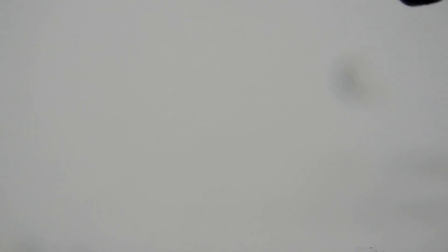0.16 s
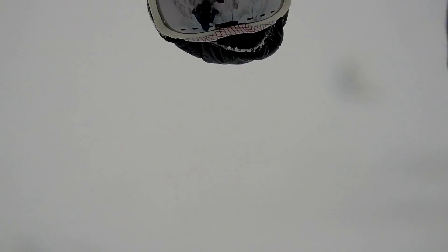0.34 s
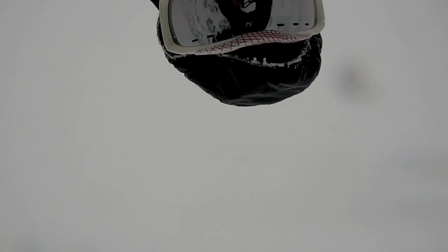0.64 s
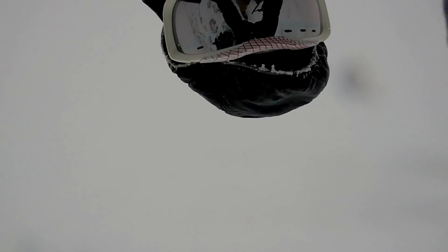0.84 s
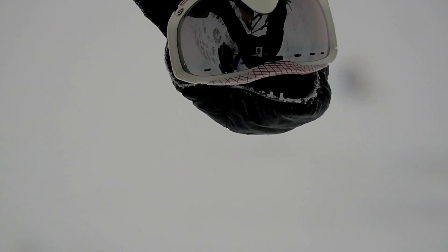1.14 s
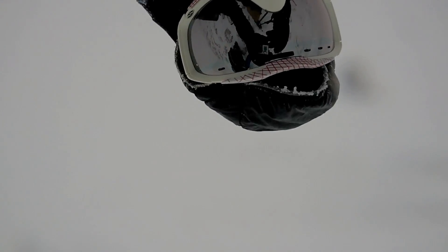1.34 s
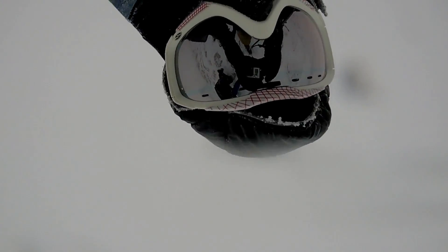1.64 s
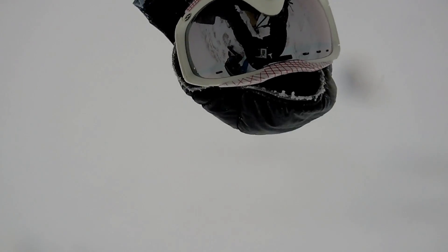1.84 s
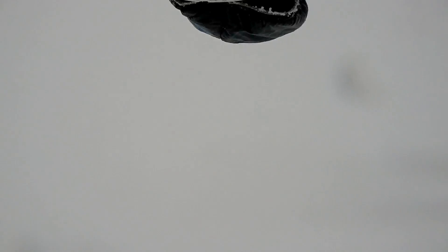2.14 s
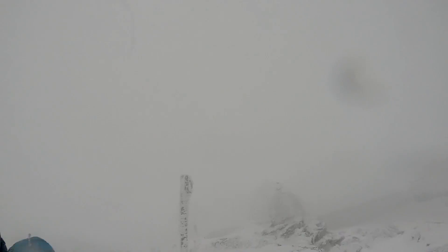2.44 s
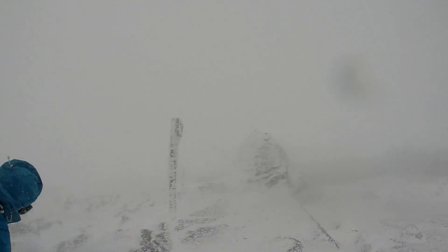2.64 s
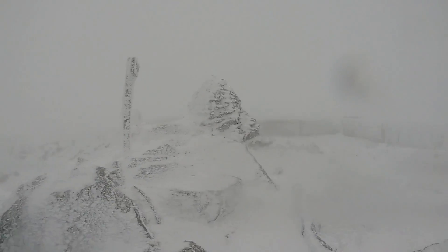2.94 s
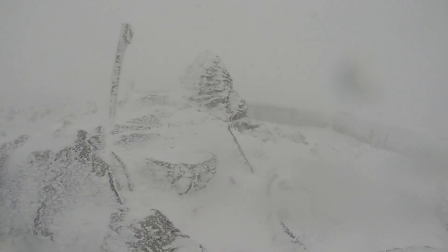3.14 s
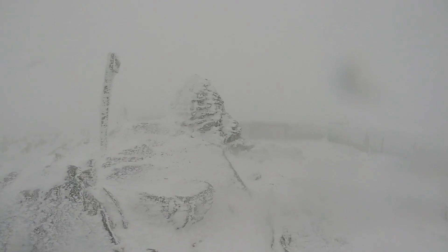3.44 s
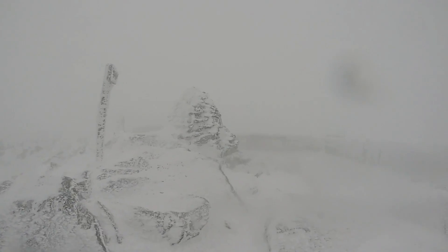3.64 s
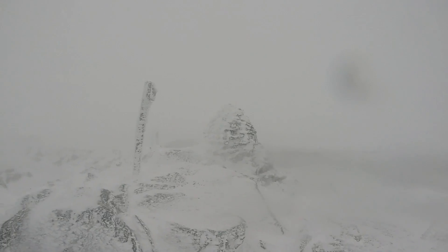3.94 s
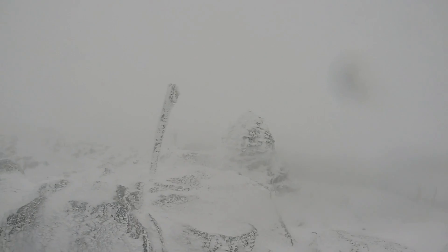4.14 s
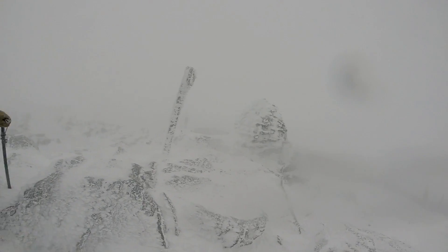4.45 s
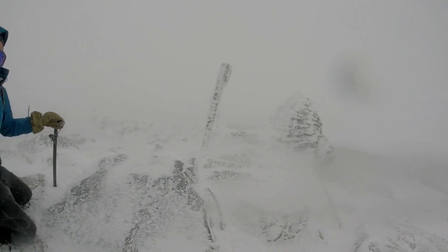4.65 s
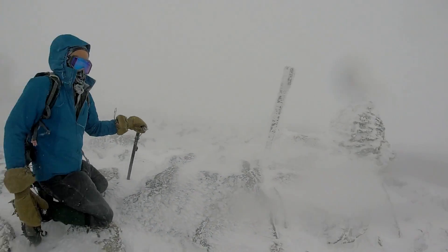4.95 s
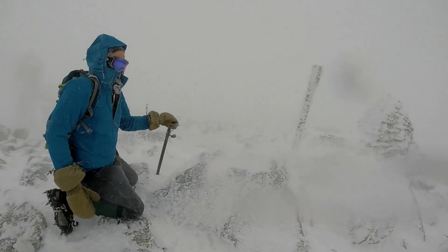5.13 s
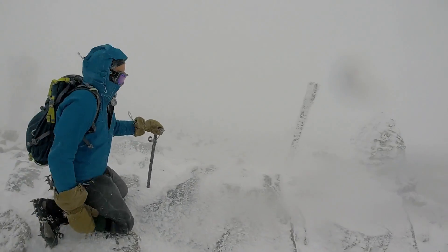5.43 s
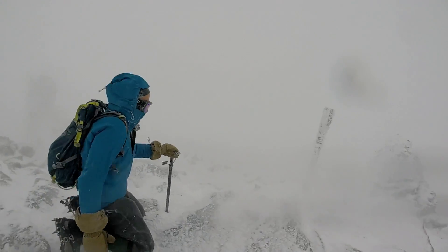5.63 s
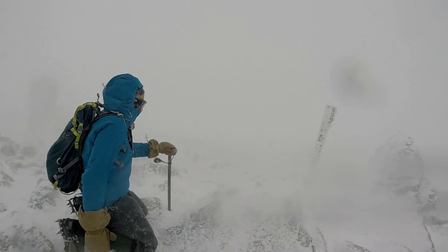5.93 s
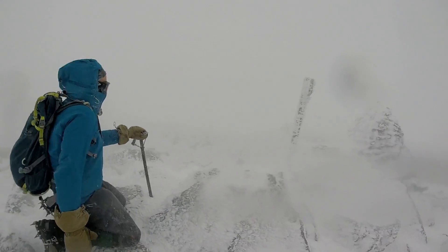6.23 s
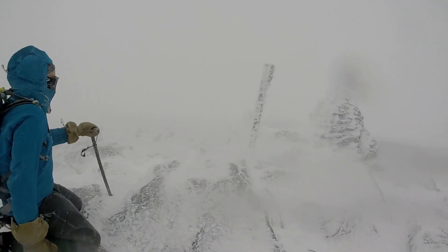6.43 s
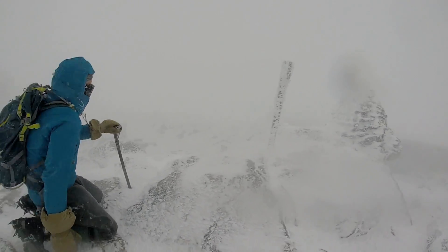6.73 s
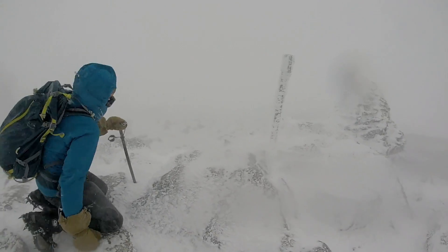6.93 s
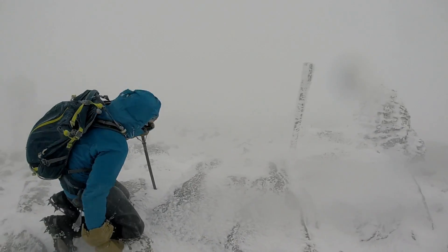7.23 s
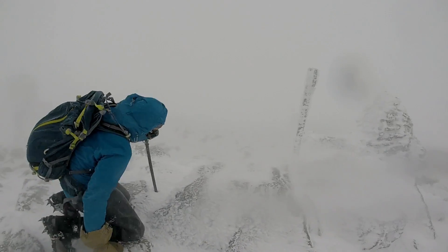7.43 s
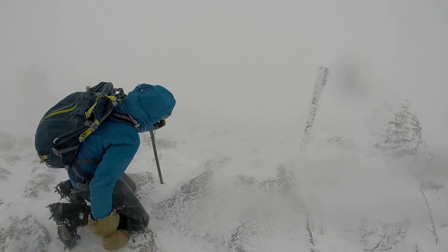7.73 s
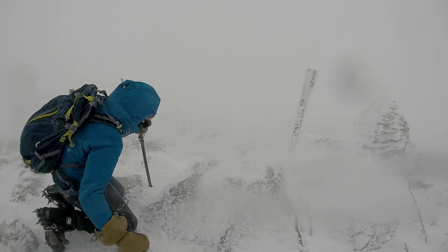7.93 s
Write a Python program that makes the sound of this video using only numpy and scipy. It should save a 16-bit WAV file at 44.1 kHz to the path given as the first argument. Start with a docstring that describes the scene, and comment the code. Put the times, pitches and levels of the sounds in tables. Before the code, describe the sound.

Wind strikes directly on a microphone inside a hard plastic shell, outdoors in blowing snow. Quick gusts slap and rumble, air rushes through the case, and snow sizzles over it. Hard ice ticks appear from the start; one short rub precedes a dense run of loud, distorted gusts around two seconds. More blasts follow to about four and a half seconds, then the sound thins into a hollow, wavering howl with scattered thumps and ticks.

```python
"""A gale on a snowy summit hits a small camera in a plastic case.
All along, gusts swell out of a steady wind: eddies thump on the microphone, air rushes through the
case's resonances and blown snow fizzes on it. From the first moments sharp gusts slap it and bits of
ice tick on the shell. Before two seconds something rubs it once; then the hardest gusts come close
together. After four seconds more of the rush turns into a howl. The loudest peaks overload softly."""
import sys
import numpy as np
from scipy import signal
from scipy.fft import rfft, irfft, next_fast_len
from scipy.io import wavfile
from scipy.ndimage import uniform_filter1d, map_coordinates

SR = 44100
rng = np.random.default_rng(int(sys.argv[2]) if len(sys.argv) > 2 else 0)


def wav_out(sig):
    """Save sig, one row per channel (or a flat mono array), as 16-bit PCM at SR to the path in sys.argv[1]."""
    wavfile.write(sys.argv[1], SR, np.round(np.clip(np.atleast_2d(sig).T, -1, 1) * 32767).astype(np.int16))


N = 356328

# Levels in these tables come before the small gains that the functions add.
# Steady wind between gusts: t/s, buffeting level/dB, rush level/dB, roar level/dB
STEADY_WIND = [(0.0, -25.0, -29, -41), (0.32, -19.0, -34.5, -33), (0.38, -28.0, -44.5, -45.5),
               (0.56, -21.5, -31, -34.5), (1.51, -17.0, -27, -33.5), (1.62, -27.5, -37, -41),
               (1.82, -23.0, -32.5, -36), (2.85, -19.0, -24, -30), (3.03, -17.5, -30, -30.5),
               (3.33, -25.5, -28, -37.5), (3.98, -22.0, -26, -30.5), (4.18, -23.5, -30.5, -31),
               (4.9, -29.0, -39.5, -43.5), (5.27, -24.0, -31, -35.5), (6.36, -20.5, -31, -34.5),
               (6.74, -25.0, -35, -41), (7.12, -25.5, -34.5, -39), (7.38, -19.5, -30.5, -31.5),
               (7.52, -27.5, -34.5, -38), (8.08, -25.5, -36, -41)]
# Gusts that swell, hold and drop away:
# start t/s, rise t/s, hold t/s, buffeting level/dB, rush level/dB, roar level/dB
GUSTS = [(0.0, 0.0044, 0.08, -25.0, -24.0, -21.5), (0.152, 0.03, 0.095, -21.0, -22.5, -27.5),
         (0.748, 0.068, 0.083, -10.5, -23.0, -41), (0.981, 0.02, 0.025, -18.5, -18, -24),
         (1.052, 0.14, 0.055, -11.5, -13.5, -20.0), (1.276, 0.018, 0.009, -16.5, -21, -28.5),
         (1.34, 0.016, 0.11, -21.5, -20.5, -29.5), (1.525, 0.032, 0.019, -16.0, -25, -32.5),
         (1.861, 0.015, 0.08, -10, -19.5, -25), (1.933, 0.032, 0.24, -13.5, -15, -19.5),
         (2.243, 0.034, 0.22, -8.0, -17.5, -19.5), (2.48, 0.11, 0.05, -16.0, -17, -23.5),
         (2.65, 0.02, 0.12, -25.0, -23, -36), (2.996, 0.186, 0.1, -20.5, -20, -26),
         (3.353, 0.12, 0.056, -17.0, -15, -27), (3.526, 0.029, 0.14, -23.5, -20.5, -32.0),
         (3.686, 0.029, 0.175, -18.0, -18.5, -29), (4.019, 0.025, 0.075, -11.0, -15.5, -23.5),
         (4.225, 0.041, 0.071, -14.0, -30.5, -23.5), (4.365, 0.075, 0.19, -12.0, -29.5, -25),
         (5.451, 0.01, 0.0083, -22.5, -26.5, -31.0), (5.559, 0.017, 0.1, -23.5, -32.5, -38),
         (5.855, 0.012, 0.041, -13.0, -48, -37), (6.202, 0.02, 0.019, -18.0, -27.5, -36),
         (7.167, 0.0096, 0.12, -18, -30.5, -38)]
# How slowly each layer dies after a gust; pressure outlasts the rush: buffeting t/s, rush t/s, roar t/s
RELEASE_TIMES = (.046, 0.021, 0.023)
# The air briefly drops away from the case: t/s, half width t/s, change of level/dB
LULLS = [(1.272, 0.013, -5), (1.614, 0.0097, -4), (2.905, 0.02, -9), (2.995, .014, -9), (3.95, 0.014, -2),
         (4.2, .02, -7)]
# Sharp gusts: t/s, rush level/dB, thump level/dB, length t/s
SLAPS = [(0.116, -19.5, -24, 0.013), (.2195, -10.5, -18, 0.015), (.7674, -18, -24, 0.012),
         (0.816, -17.5, -18, 0.019), (0.943, -19, -22, 0.0069), (1.135, -30, -27, .045),
         (1.211, -18.5, -15, .04), (1.877, -11.5, -15, 0.018), (2.27, -21, -11, 0.035),
         (2.365, -9, -10, 0.016), (2.416, -13, -5.5, 0.021), (2.466, -12.5, -13, 0.02),
         (2.535, -18, -5, 0.009), (3.017, -23.5, -27, 0.012), (3.185, -40, -27, 0.0081),
         (3.506, -18.5, -11, .015), (4.127, -15.5, -5, 0.014), (4.275, -15.5, -22, 0.02),
         (4.35, -39, -10, 0.0076), (4.384, -18, -13, 0.011), (4.469, -17, -5, 0.01),
         (4.597, -20, -10, 0.015), (5.12, -57, -16, 0.018), (5.8694, -15.5, -3.5, 0.02),
         (5.905, -20.5, -9, 0.018), (5.977, -23.5, -32, 0.0092), (6.064, -28, -9, .015),
         (6.239, -34, -20, 0.008), (6.826, -25, -19.5, 0.0094), (7.003, -25.5, -12.5, 0.0099),
         (7.309, -20.5, -21, 0.01)]
# The camera turns and the wind meets the case at a new angle: t/s, share of the rush that may howl (0-1)
HOWL_SHARE = [(0, 0.12), (4.1, 0.67), (4.8, 0.84), (5.7, 0.79), (6.5, 1), (8.08, 0.75)]
# How much snow the air carries: t/s, spray level/dB relative to the rush
SNOW_LOAD = [(0, -13), (.48, -12.5), (.72, -19.5), (2.09, -18), (2.59, -14), (4.07, -13), (4.35, -19),
             (6.5, -19), (8.08, -15.5)]
# Bits of ice on the shell: t/s, peak level/dB, centre f/Hz
ICE_HITS = [(0.2206, -3, 1300), (0.2208, -13, 2580), (0.2859, -2, 2530), (.348, -22, 4200),
            (.4626, -25.5, 5000), (0.6765, -12, 4200), (0.943, -18, 2798), (.971, -12, 3000),
            (1.3477, -20, 2210), (1.5575, -20, 8500), (3.1828, -5, 3205), (3.208, -6, 2427),
            (3.2833, -6.5, 2512), (3.2962, -10, 8996), (4.6419, -21, 10000), (4.802, -27, 5600),
            (4.863, -22, 3000), (4.892, -11.5, 2077), (4.94, -20, 3010), (5.1554, -19, 1994),
            (5.396, -15.5, 3480), (5.6581, -14, 3000), (5.789, -21, 2995), (5.866, -12, 1593),
            (6.007, -14, 3026), (6.0454, -10, 2010), (6.2149, -16, 2425), (6.2362, -11.5, 2802),
            (6.444, -17.5, 2977), (6.4796, 3, 2190), (6.8262, -14, 3200), (6.9487, -23, 4780),
            (7.1538, -16.5, 3115), (7.269, -12, 2797), (7.3107, -9.5, 2608), (7.333, -17, 3160),
            (7.4434, -13, 3136), (7.6157, -18, 3290)]
# Ringing modes of the shell: f/Hz, level/dB, ring time as a factor
SHELL_MODES = [(890, -17, .9), (1665, -1.5, 2.4), (1834, 9, 1.06), (2660, 7.5, 0.42), (2945, 2, 1.65),
               (3420, 2.5, 0.9), (4600, 2, 0.51), (5520, -4.5, 2.1), (6270, 1.5, 0.73), (7560, -1, 0.65),
               (9530, -0.5, 0.74), (11200, -6, 0.81), (12900, -7, .6)]
# A brief rub on the case: t/s, level/dB
RUB_LEVEL = [(1.63, -70), (1.638, -19), (1.66, -17.5), (1.69, -23), (1.75, -28), (1.78, -21.5), (1.82, -31),
             (1.85, -51), (1.87, -70)]

# Spectra, only the shape counts: f/Hz, level/dB (per Hz)
BUFFET_SPECTRUM = [(4, -25), (12, 0), (32, -0.5), (80, 1.5), (125, -4.5), (175, -9.5), (240, -16),
                   (340, -28.5), (500, -29), (1200, -38), (5000, -90)]
ROAR_SPECTRUM = [(60, -16), (180, 5), (340, 1.5), (450, -3.5), (700, -6), (950, -6), (1150, -17),
                 (1600, -4), (3000, -30.5), (8000, -70)]
RUSH_SPECTRUM = [(100, -54), (700, -15.5), (1120, -16), (1330, -11.5), (1560, -5), (2000, -3), (3000, -6),
                 (4000, -15.5), (7000, -31.5), (14000, -67)]
HOWL_SPECTRUM = [(150, -14), (900, -24), (1400, -15), (1620, -1), (1830, 4.5), (2130, -9.5), (2500, -9),
                 (3050, -9.5), (3550, -13.5), (4000, -20), (4700, -34), (5400, -19.5), (7000, -38.5),
                 (14000, -53)]
SPRAY_SPECTRUM = [(1200, -29), (2700, 2.5), (4300, -2), (6400, -2), (8300, -8), (9700, -11), (12000, -18.5),
                  (15000, -29)]
FIZZ_SPECTRUM = [(2500, -30), (6000, -3), (9800, 2), (12500, -3), (15000, -21)]
RUB_SPECTRUM = [(400, -23), (900, -4), (1250, -4.5), (1750, 7), (2400, 3.5), (3200, 1), (3900, -10),
                (8000, -19.5), (10000, -36)]
GRIT_SPECTRUM = [(1200, -17), (2300, 11), (3000, -2.5), (3500, -2), (4200, -5), (6500, -33), (12000, -47)]
# Resonances of the case: centre f/Hz, width f/Hz, level/dB
CASE_RESONANCES = [(950, 130, 1.5), (1890, 140, 2.5), (2100, 220, -2.5), (2530, 250, 2), (3540, 190, 0),
                   (4160, 950, 0), (4780, 370, 0), (5340, 630, 5)]
# How alike the two microphone ports hear: f/Hz, likeness (0-1)
PORT_LIKENESS = [(1200, 1), (3000, .97), (6000, .91), (9000, .79), (14000, .64)]

WAVER_DB = 1.08  # typical wander of the wind's strength, a few times a second
HOWL_WAVER, HOWL_WAVER_HZ = .03, 14.04  # typical share by which the pitch wanders, and its fastest rate
ICE_RING_S = 0.00078  # basic ring time of the shell
EDGE_HZ = 15500  # top of the treble that is kept


def wind():
    """Levels of buffeting, rush and roar in dB: gusts add power to the steady wind; all waver together."""
    t = np.arange(SR) / SR
    power = amp(follow(STEADY_WIND)) ** 2
    for start, rise, hold, *levels_db in GUSTS:
        swell = np.minimum(t / rise, 1)
        after = np.maximum(t - rise - hold, 0)
        for layer, db, release in zip(power, levels_db, RELEASE_TIMES):
            gust = amp(db) * swell * np.exp(-after / release)
            add(layer, start, gust ** 2)
    return 10 * np.log10(power) + WAVER_DB * flutter(4.6, 15)


def lulls():
    """Brief dips of the rush in dB, as the air drops away from the case."""
    t = np.arange(N) / SR
    return sum(db * np.exp(-((t - s) / width) ** 2) for s, width, db in LULLS)


def eddies(buffet_db, size=2600, pace_per_db=0.0337, top_pace=1.1):
    """Turbulent pressure at the microphone: slow lumps in a lull, quicker ones as the wind rises."""
    lumps = rng.standard_normal(N) * amp(2.7 * flutter(6.5, 83))
    lumps = colour(lumps, BUFFET_SPECTRUM)
    # stronger wind carries the lumps past faster
    pace = np.minimum(np.exp(pace_per_db * (buffet_db + 19)), top_pace)
    lumps = play_at(lumps, np.cumsum(pace))
    # even out the strength over a short window (size in samples)
    local_power = uniform_filter1d(lumps ** 2, size)
    return lumps / np.sqrt(local_power + 0.023)


def slaps():
    """Each sharp gust pushes, then sucks at the microphone, and rushes while it lasts."""
    pressure, rush = np.zeros(N), np.zeros(N)
    for s, rush_db, thump_db, length in SLAPS:
        u = np.arange(int(3 * length * SR)) / (length * SR)  # time in lengths of the slap
        swell = 4 * u * np.exp(1 - 4 * u)
        push_suck = np.sin(2 * np.pi * 1.15 * u)
        add(rush, s, amp(rush_db) * swell)
        add(pressure, s, amp(thump_db) * 1.69 * swell * push_suck)
    return pressure, rush


def air(rush_db, slap, churn, calm_db=-28):
    """Weak wind howls in the case's main resonance; strong wind tears across it in a broad, ragged rush."""
    power = amp(rush_db) ** 2
    share = np.clip(follow(HOWL_SHARE)[0], 0, 1)
    # the howl stops growing well above calm_db; the rest of the power goes into the rush
    howl_power = share * power / (1 + power / amp(calm_db) ** 2)
    howl = np.sqrt(howl_power) * howling()
    strength = amp(-1.22) * np.sqrt(power - howl_power) * churn + amp(-4.5) * slap
    ragged = 0.84 * grains(per_s=1500, spread_db=1.0)
    drive = evened(rng.standard_normal((2, N)) + ragged)
    return howl + strength * colour(drive, RUSH_SPECTRUM)


def howling():
    """Air sings in the case's main resonance with a wandering pitch."""
    place = np.cumsum(1 + HOWL_WAVER * flutter(3.92, HOWL_WAVER_HZ))
    tones = colour(rng.standard_normal((2, N)), HOWL_SPECTRUM)
    return np.array([play_at(tone, place) for tone in tones])


def snow(spray_db, slap, churn, hard_db=-36):
    """Fine snow sandblasts the case in flurries; the fastest grains fizz highest."""
    drive = evened(0.6 * rng.standard_normal((2, N)) + grains(per_s=4000, spread_db=3.0))
    strength = amp(spray_db + 6.0) * churn + amp(-13) * slap
    spray = strength * colour(drive, SPRAY_SPECTRUM)
    fast = 1 / (1 + amp(hard_db - spray_db))  # nears 1 in hard wind
    fizz = colour(grains(per_s=8200, spread_db=7.5), FIZZ_SPECTRUM)
    return spray + amp(spray_db - 5.5) * fast * fizz


def roar(roar_db, slap, churn):
    """Small eddies break on the microphone opening in ragged puffs."""
    puffs = evened(rng.standard_normal(N) + 0.92 * grains(per_s=700, spread_db=2.5)[0])
    strength = amp(roar_db - 0.36) * churn + amp(-4.5) * slap
    return strength * colour(puffs, ROAR_SPECTRUM)


def ice():
    """Each bit of ice rings the shell's modes, strongest near its own centre frequency."""
    out, t = np.zeros(N), np.arange(1200) / SR
    hz, db, ring = np.transpose(SHELL_MODES)[:, :, None]
    u = t / (ICE_RING_S * ring)  # time in ring times of each mode
    for s, peak_db, centre_hz in ICE_HITS:
        octaves_off = np.log2(hz / centre_hz)
        weight = amp(db) / (1 + abs(octaves_off / 0.61) ** 2.1)
        tones = np.sin(2 * np.pi * (hz * t + rng.random(hz.shape)))
        tick = (weight * u * np.exp(-u) * tones).sum(0)
        add(out, s, amp(peak_db) * tick / abs(tick).max())
    return out


def rub():
    """A short, dry scuff against the case, made of many tiny impacts."""
    return amp(follow(RUB_LEVEL)[0]) * colour(grains(per_s=6100, spread_db=0.5), RUB_SPECTRUM)


def grit(db=-44.5):
    """Stray crumbs of ice patter faintly on the shell, each skittering for a moment."""
    crumbs = grains(per_s=45, spread_db=4.0, largest=3.4)
    skitter = rng.standard_normal((1, 200)) * np.exp(-np.arange(200) / 45)
    patter = signal.oaconvolve(crumbs, skitter, axes=1)[:, :N]
    return amp(db) * colour(patter, GRIT_SPECTRUM)


def grains(per_s, spread_db, largest=6):
    """Random impacts of unequal size on two channels; rms 1."""
    size = amp(spread_db * np.minimum(rng.exponential(1, (2, N)), largest))
    sign = rng.choice([-1, 1], (2, N))
    hits = rng.random((2, N)) < per_s / SR
    return evened(size * sign * hits)


def flutter(low_hz, high_hz):
    """Random wavering, mostly between two rates; rms 1."""
    size = next_fast_len(N)
    hz = np.fft.rfftfreq(size, 1 / SR)
    low_cut = hz ** 2 / (hz ** 2 + low_hz ** 2)
    shape = low_cut / np.sqrt(hz + low_hz) / (1 + (hz / high_hz) ** 4)
    return evened(irfft(rfft(rng.standard_normal(size)) * shape, size)[:N])


def colour(x, spectrum):
    """Filters x by a spectrum and by the resonances of the case; rms 1."""
    size = next_fast_len(N)
    hz = np.fft.rfftfreq(size, 1 / SR)
    case_db = sum(db / (1 + (2 * (hz - centre) / width) ** 2) for centre, width, db in CASE_RESONANCES)
    gain = amp(read(spectrum, hz) + case_db)
    return evened(irfft(rfft(x, size) * gain, size)[..., :N])


def ports(pair):
    """Two unrelated noises become the sound at two close ports: alike except in the treble."""
    size = next_fast_len(N)
    same = np.clip(read(PORT_LIKENESS, np.fft.rfftfreq(size, 1 / SR)), 0, 1)
    gains = np.sqrt([(1 + same) / 2, (1 - same) / 2])
    mid, side = irfft(rfft(pair, size) * gains, size)[:, :N]
    return np.array([mid + side, mid - side])


def play_at(x, place):
    """Reads x at moving places (in samples), so its pitch follows their pace."""
    return map_coordinates(x, [place], order=3, mode="mirror")


def amp(db):
    """Decibels to gain."""
    return 10 ** (np.asarray(db) / 20)


def evened(x):
    """Scales to an rms of 1."""
    return x / np.sqrt(np.mean(x ** 2) + 1e-20)


def read(points, hz):
    """Reads a table on a log-frequency axis."""
    f, value = np.transpose(points)
    return np.interp(np.log(hz + 1), np.log(f), value)


def follow(rows):
    """The columns of a table over time, one value a sample."""
    s, *columns = np.transpose(rows)
    return [np.interp(np.arange(N) / SR, s, c) for c in columns]


def add(mix, s, sound):
    """Mixes a sound in at time s (seconds)."""
    part = mix[max(round(s * SR), 0):][:len(sound)]
    part += sound[:len(part)]


def scene():
    """Buffeting drives a shared churn in the roar, rush and snow; slaps, ice, rub and grit join in."""
    buffet_db, rush_db, roar_db = wind()
    rush_db = rush_db + lulls()
    spray_db = rush_db + follow(SNOW_LOAD)[0]
    eddy = eddies(buffet_db)
    thump, slap = slaps()
    # the rush surges with each pressure swing, the more so when the buffeting is hard
    force = 1 / (1 + amp(-40.5 - buffet_db))
    swing = evened(uniform_filter1d(abs(eddy), size=150))
    surge_db = 2.1 * (swing - 1) + 1.52 * flutter(3.2, 140)
    churn = evened(amp(force * surge_db))
    hiss = air(rush_db, slap, churn) + snow(spray_db, slap, churn) + grit() + rub()
    low = amp(buffet_db - .8) * eddy + thump + roar(roar_db, slap, churn)
    return ports(hiss) + low + ice()


def record(dry, knee=.75):
    """The left port hears the treble a sample late; peaks overload softly; then the band limit."""
    low_pass = signal.butter(4, 1300, fs=SR, output="sos")
    bass = signal.sosfiltfilt(low_pass, dry[0])
    x = np.array([bass + np.roll(dry[0] - bass, 1), dry[1]])
    # what rises above the knee is squeezed
    linear = np.clip(x, -knee, knee)
    x = linear + (1 - knee) * np.tanh((x - linear) / (1 - knee))
    band_limit = signal.firwin(301, EDGE_HZ, window=("kaiser", 8), fs=SR)
    return signal.oaconvolve(x, band_limit[None], "same")


dry = scene()
out = record(dry)
wav_out(out)
```